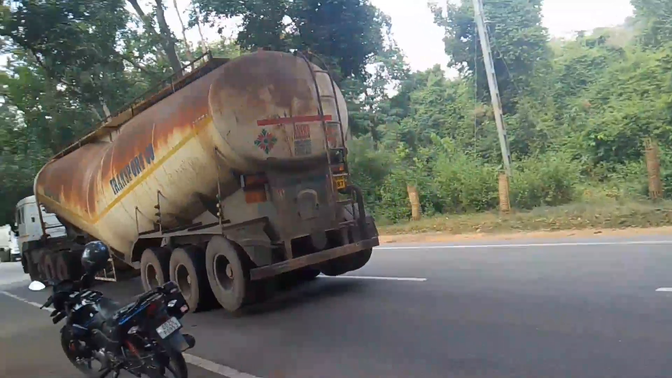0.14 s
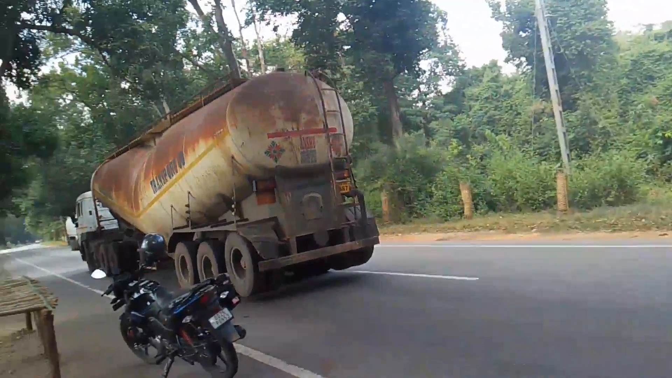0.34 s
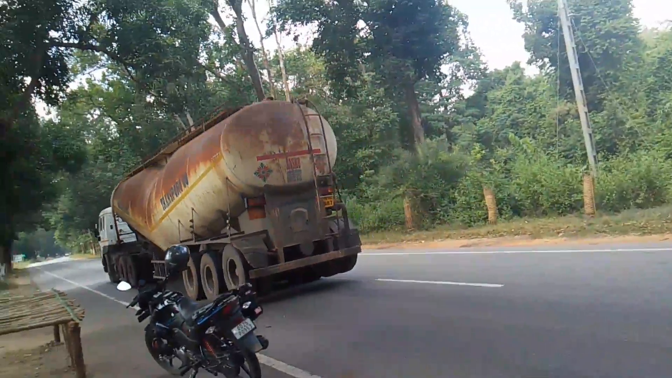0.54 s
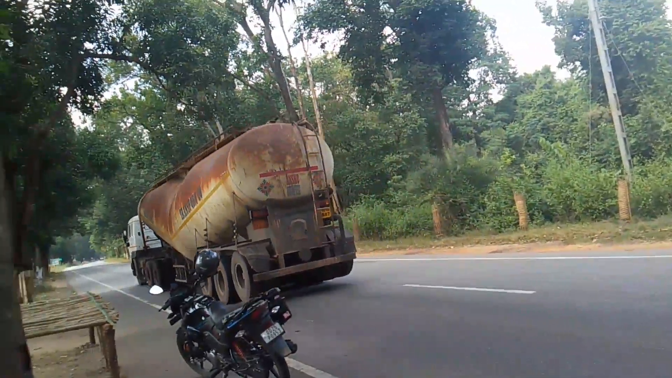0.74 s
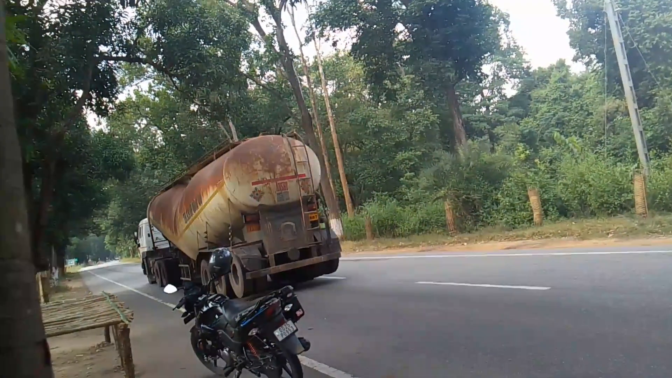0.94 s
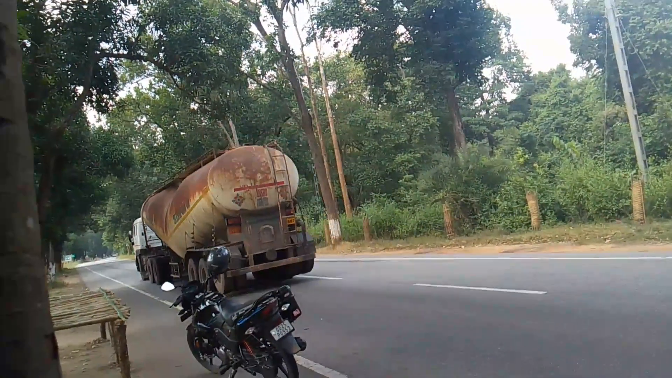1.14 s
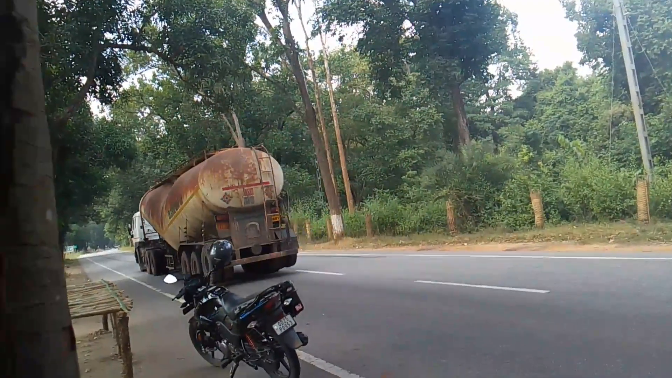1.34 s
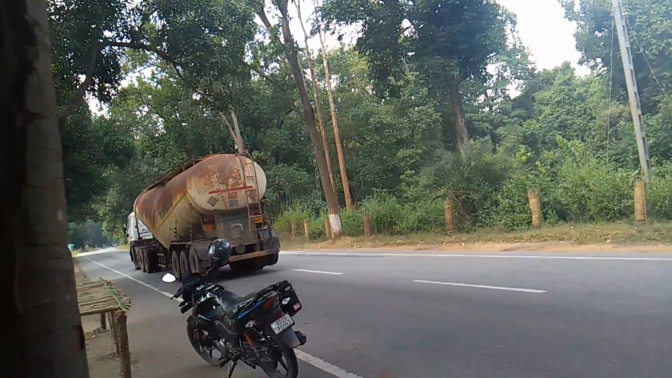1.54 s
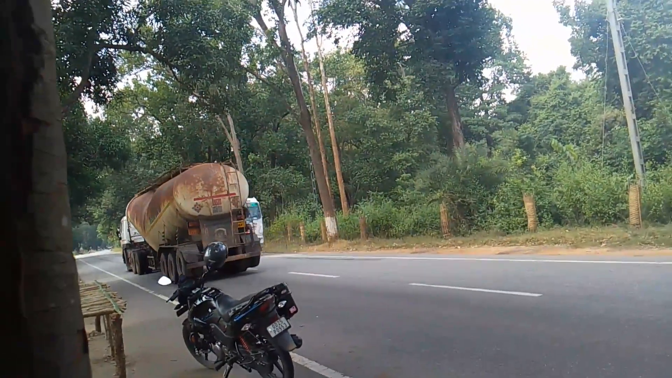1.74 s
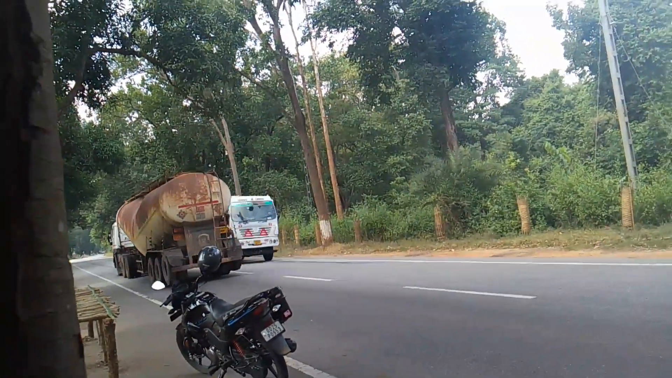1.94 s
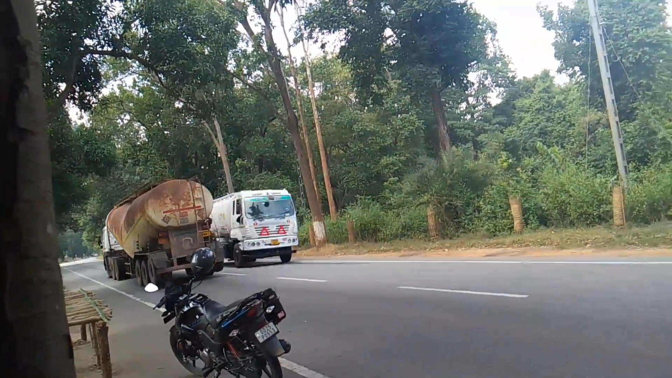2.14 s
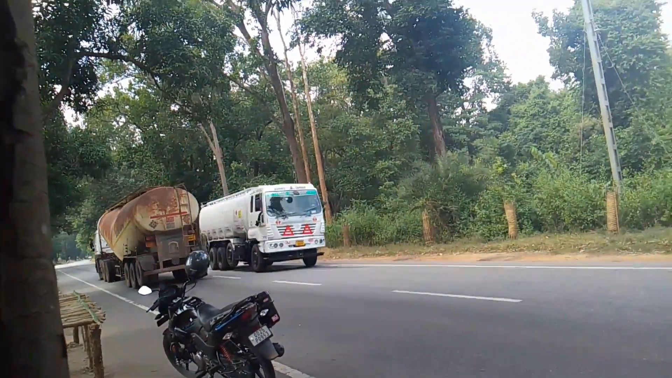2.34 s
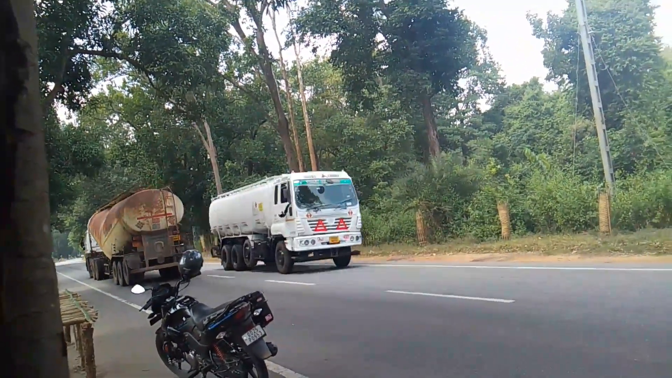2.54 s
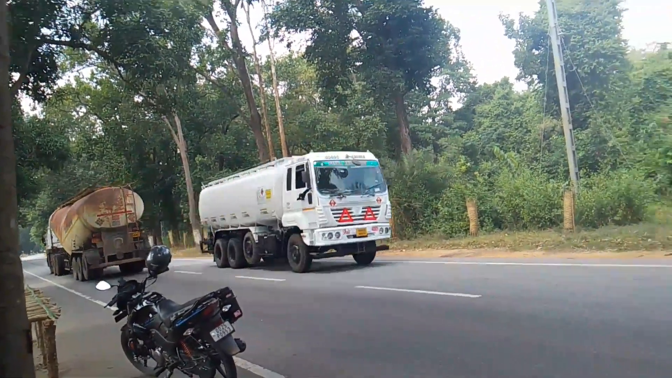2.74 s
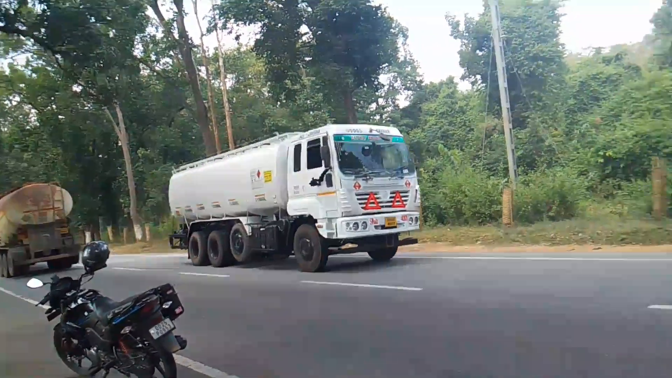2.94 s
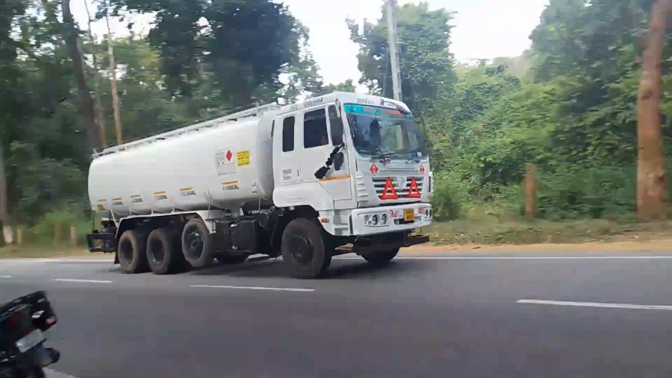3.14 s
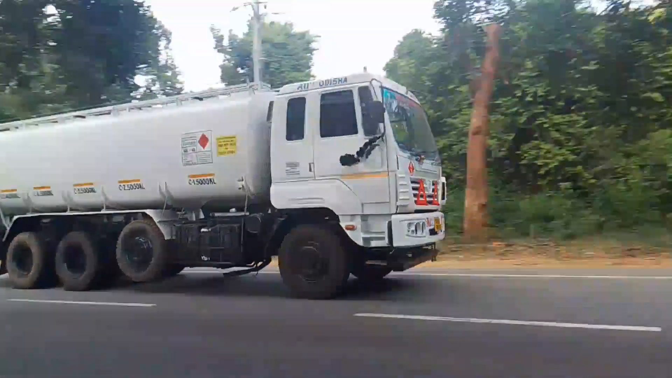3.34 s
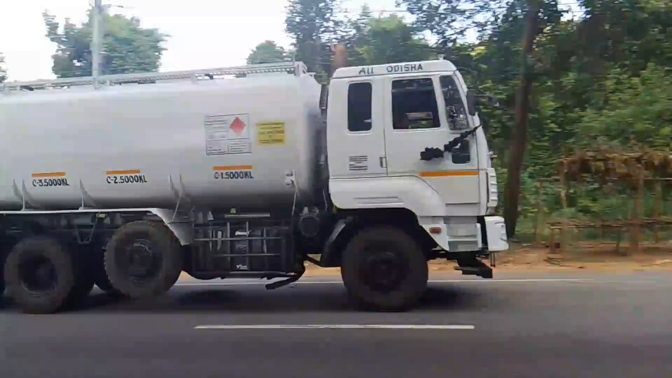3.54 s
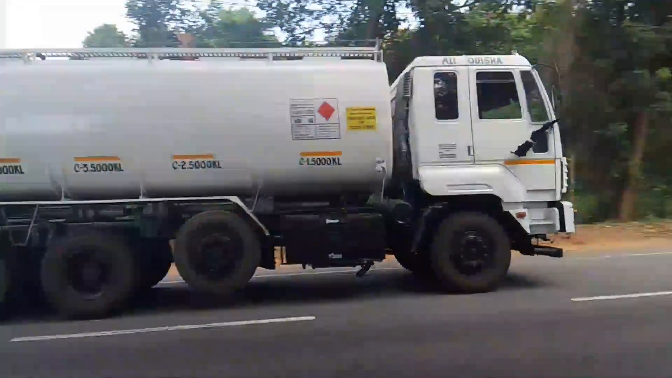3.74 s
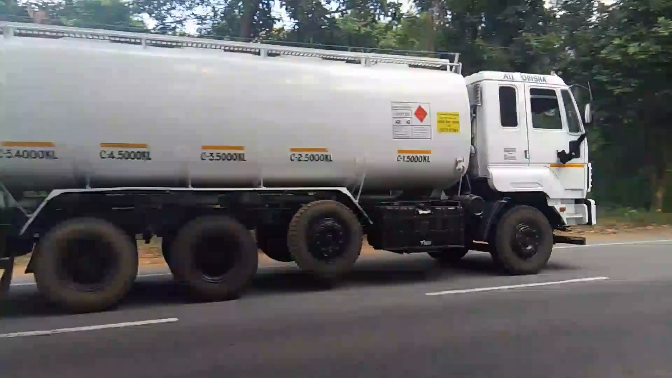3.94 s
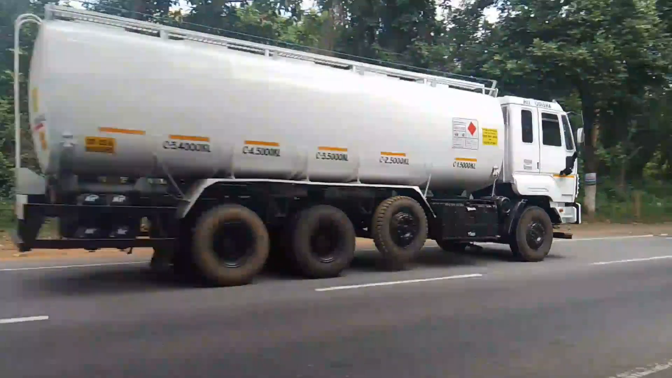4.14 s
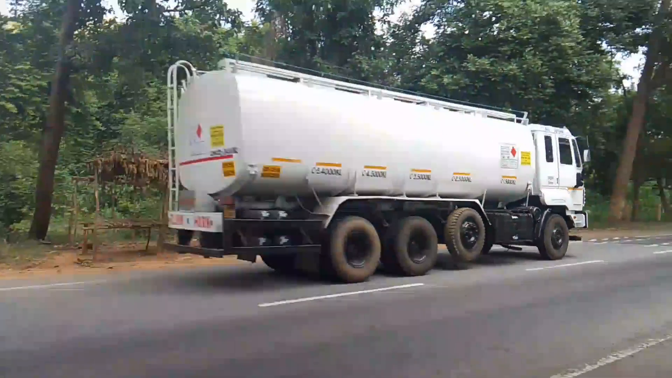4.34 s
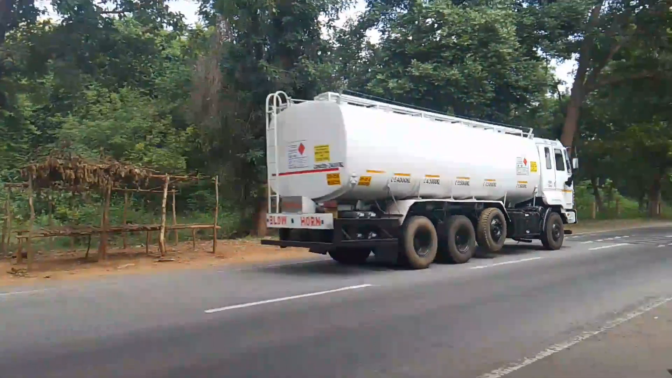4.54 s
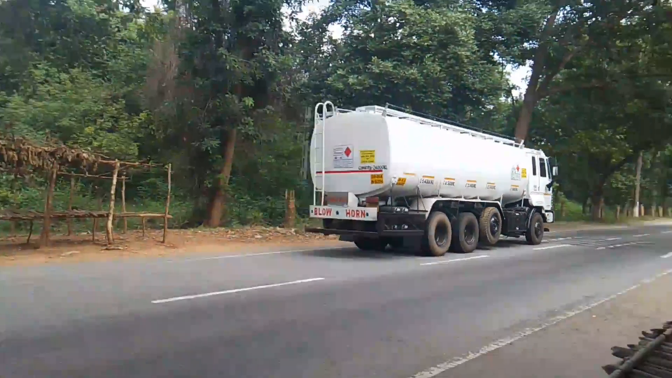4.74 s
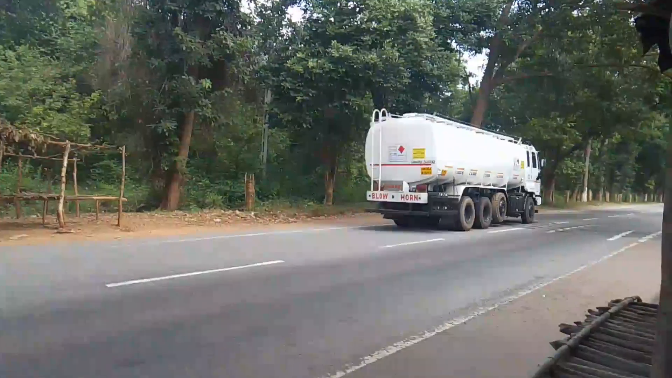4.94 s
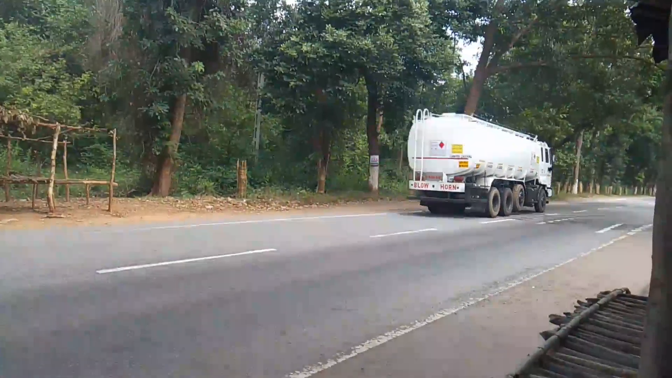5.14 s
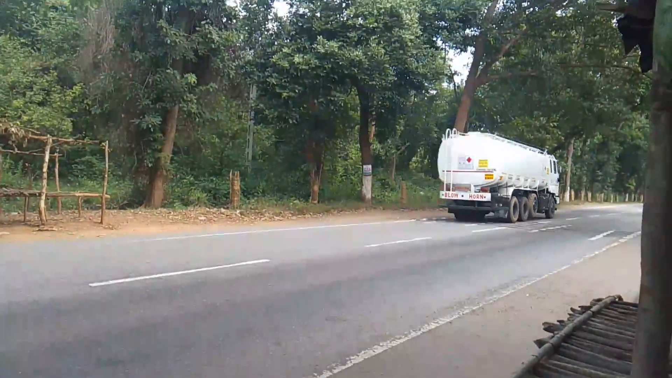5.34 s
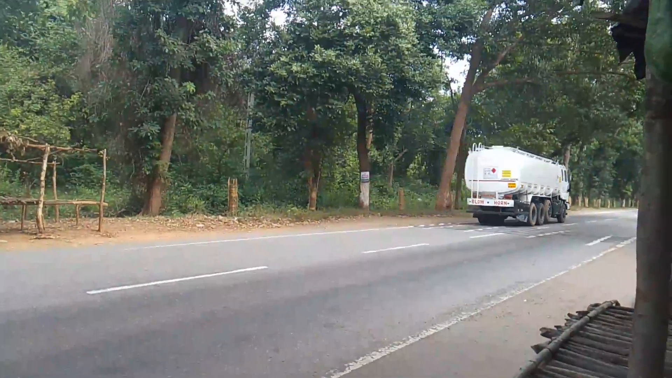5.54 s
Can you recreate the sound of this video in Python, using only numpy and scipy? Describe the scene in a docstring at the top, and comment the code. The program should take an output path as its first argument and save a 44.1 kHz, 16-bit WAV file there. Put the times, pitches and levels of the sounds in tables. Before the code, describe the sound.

A heavy tanker truck pulls away, booming and rattling, as a second one passes close by with roaring tyres and clunking steel.

```python
"""A tanker truck passes close by at about 4 s on a country road, heard from the verge. Its tyres roar,
hiss and hum, falling in pitch as it goes by, while loose steel clunks and grit clinks. It comes out from
behind a first tanker, which has just gone by and pulls away with a booming exhaust and a rattling trailer.
Both trucks rumble, and at the end the air dragged behind the second one stirs the roadside leaves."""
import sys
import numpy as np
from scipy import signal
from scipy.fft import rfft, irfft, next_fast_len
from scipy.io import wavfile
from scipy.ndimage import map_coordinates

SR = 44100
rng = np.random.default_rng(int(sys.argv[2]) if len(sys.argv) > 2 else 0)


def digitize_waveform(pressure):
    """Quantize a signal to 16-bit integers and store it at the path in sys.argv[1].

    Rows of a 2-D input are taken as channels; values are limited to [-1, 1].
    """
    field = np.atleast_2d(pressure).T
    bounded = np.clip(field, -1, 1)
    quanta = np.round(bounded * 32767).astype(np.int16)
    wavfile.write(sys.argv[1], SR, quanta)


N = 246959
T = np.arange(N) / SR
FREQS = np.arange(N // 2 + 1) * SR / N
SPEED_M_S, LANE_M, ABREAST_S = 16.5, 7.5, 4.07  # passing truck: speed, distance, when level with us
GONE_BY_S, HIDDEN_S = 0.43, 2.03  # leaving truck: how long ago it passed, when the other starts to hide it

# Road roar from the front of the truck, then from its rear: (pitch [Hz], level [dB])
FRONT_ROAR = [(270, -12), (337, 1), (390, -4), (460, 2), (520, 3.5), (580, 1), (720, -3.5), (930, -1.5),
              (1120, -5.5), (1200, -3), (1320, -10), (1660, -11.5), (1850, -20.5), (2300, -36)]
REAR_ROAR = [(295, 2.5), (415, -6.5), (505, -2), (590, -3), (745, -0.5), (900, -5), (1100, -3.5),
             (1340, -6), (1560, -9), (1740, -9), (1980, -21), (2480, -21.5)]
# The roar surges briefly: (time [s], rise [dB], half length [s])
ROAR_SURGES = [(2.44, 1.5, 0.042), (2.88, 1, 0.085), (4.31, 0.5, 0.023)]
# Hiss of the tyres on the road: (pitch [Hz], level [dB])
TYRE_HISS = [(1700, -1), (1930, -8), (2200, -3.5), (2650, -7.5), (3200, -8.5), (3900, -9.5), (4870, -15.5),
             (5500, -22.5), (7000, -21.5), (8400, -22.5), (9800, -39), (11400, -36), (13000, -51),
             (15400, -51)]
# The truck's frame shakes and the sizzle flares: (time [s], rise [dB], half length [s])
FRAME_SHAKES = [(3.4, 1.8, 0.12), (4.3, 1.5, .08), (4.95, 4, 0.025)]
def passing_truck(closest_s=4.06, pass_width_s=0.53):
    """Tyres roar and hiss on the road, front first, then rear; the highest sizzle only carries nearby."""
    along = (T - closest_s) / pass_width_s
    rear_share = (1 + np.tanh(along + 0.55)) / 2
    front = doppler(colour(ripple(noise(), depth_db=2.8, width_hz=28), FRONT_ROAR))
    rear = doppler(colour(ripple(noise(), depth_db=2.8, width_hz=28), REAR_ROAR))
    roar = np.sqrt(1 - rear_share) * front + np.sqrt(rear_share) * rear
    # the hollow wheel arches are heard only while they face the verge
    arches = colour(noise(), [(340, -1.5), (450, -2.5), (570, -1.5), (640, -5.5), (740, -4), (900, -7.5)])
    facing = 0.74 / (1 + along ** 2) ** 2
    roar = np.sqrt(1 - facing) * roar + np.sqrt(facing) * arches
    roar *= goes_by(db=-27, falloff=0.76, forward_db=0.94) * undb(.5 * wander(45) + bumps(ROAR_SURGES))
    grit = doppler(ripple(noise() + .45 * grains(1800, 2.9), depth_db=1.8, width_hz=110))
    hiss = colour(grit * undb(.6 * wander(35)), TYRE_HISS)
    hiss *= goes_by(db=-41.5, falloff=0.69, forward_db=0.54)
    spray = doppler(ripple(noise() + .55 * grains(1500, 2.9), depth_db=1.8, width_hz=140))
    spray *= undb(1.1 * wander(30))
    sizzle = colour(spray, [(4500, -4), (6500, 6), (8800, 5), (10000, 0.5), (13000, -8), (15500, -8)])
    sizzle *= goes_by(db=-48.5, falloff=1.44, forward_db=0.3, behind_m=2.6) * undb(bumps(FRAME_SHAKES))
    return roar + hiss + sizzle


# The nearest tyres hum in swells: (start [s], length [s], level [dB], fade [dB per s])
HUM_SWELLS = [(3.645, .17, -21.1, -6), (3.862, .365, -20.4, -9), (4.274, .33, -17, 22),
              (4.625, .04, -25, 0), (4.738, .17, -22, 50), (4.96, .21, -23, 14), (5.25, .07, -28.5, 0)]
# Higher tones of that hum: (multiple of the hum's pitch, level [dB])
TREAD_OVERTONES = [(2, -23), (3, -24), (4, -29)]
def tread_hum(tread_hz=243.6, blocks_per_tyre=52):
    """Tread blocks slap the road; each wheel turn bends the pitch, and the many tyres waver together."""
    hz = tread_hz * pitch_shift()
    wheel = turns(hz / blocks_per_tyre)
    phase = turns(hz * (1 + 0.012 * np.sin(wheel)))
    swells = np.zeros(N)
    for start, length, db, fade in HUM_SWELLS:
        on_off = sets_in(start, rise_s=.008) * (1 - sets_in(start + length, rise_s=.018))
        swells += undb(db - fade * np.clip(T - start, 0, length)) * on_off
    overtones = sum(undb(db) * beating(multiple * phase, 11) for multiple, db in TREAD_OVERTONES)
    near_tyre = (np.sqrt(2) * np.sin(phase) + overtones) * swells
    chorus_gain = goes_by(db=-33, falloff=0.084, forward_db=-0.2)
    chorus_share = chorus_gain / np.hypot(chorus_gain, swells)  # the other tyres give way to a near one
    return near_tyre + beating(phase, 19.4) * chorus_gain * chorus_share


# Swells of the whine as the truck comes closer: (time [s], level [dB], half length [s])
WHINE_SWELLS = [(2.43, -40.5, .06), (2.64, -42, .12), (2.875, -35.5, .1), (3.1, -39, .07)]
def tyre_whine(at_tyre_hz=483):
    """The tyres throw a wavering whine ahead of the truck, lost in the roar once it is near."""
    swells = sum(undb(db) * bell(s, half) for s, db, half in WHINE_SWELLS)
    hz = at_tyre_hz * pitch_shift() * (1 + .022 * wander(35))
    return np.sqrt(2) * np.sin(turns(hz)) * swells


# Brief tones in the roar: (time [s], level [dB], half length [s], pitch before the Doppler shift [Hz])
ROAR_TONES = [(3.45, -42, .09, 1230), (3.6, -38.5, .07, 610), (3.81, -39, .08, 970), (3.92, -37, .06, 730),
              (4.29, -36.5, .05, 595), (4.75, -40, .05, 760), (4.95, -44, .1, 1505)]
def roar_tones():
    """Brief tones stand out of the road roar, one after another."""
    out = np.zeros(N)
    for s, db, half, hz in ROAR_TONES:
        phase = turns(hz * pitch_shift() * (1 + .012 * wander(25)))
        out += np.sqrt(2) * undb(db) * bell(s, half) * np.sin(phase)
    return out


# Engine speed, nearly the same for both trucks: (time [s], firing rate [Hz])
FIRING_RATE = [(0, 62.6), (.75, 63.1), (1.5, 63.4), (1.75, 64), (3.5, 64.2), (4.5, 65.5), (5.6, 67)]
def firing_phase():
    """One turn for each firing of the engine."""
    return turns(np.interp(T, *np.transpose(FIRING_RATE)))


# Tones in the exhaust: (multiple of the firing rate, level [dB])
EXHAUST_TONES = [(1, -1), (2, -19.5), (3.42, -26), (4.13, -24), (5, -30), (5.55, -28), (6, -30)]
# The boom dips briefly, or swells where the depth is negative: (time [s], depth [dB], half length [s])
BOOM_DIPS = [(1.45, 1, 0.068), (1.955, 7, 0.043), (2.58, 7, 0.037), (3.0, 3, 0.13), (4.76, 13, 0.089),
             (5.1, -0.5, 0.089), (5.36, 11, 0.084)]
def exhaust(loudest_s=0.41, fade_s=1.23, overtone_fade_db_per_s=4.5):
    """Engine firings make a boom that turns rough as the two trucks mix; its higher tones fade sooner."""
    gain = undb(-21 - bumps(BOOM_DIPS)) / np.hypot(1, (T - loudest_s) / fade_s)
    phase = firing_phase()
    tones = np.zeros(N)
    for multiple, db in EXHAUST_TONES:
        unsteady = min(multiple - 1, 1)  # 0 for the lowest tone, which stays firm
        drift_db = unsteady * (2.2 * wander(7) - overtone_fade_db_per_s * T)
        wobble = unsteady * .25 * wander(6)
        tones += undb(db + drift_db) * np.sin(multiple * phase + wobble)
    roughness = .3 * sets_in(3.0, rise_s=0.27) * beating(phase, 28)
    return (np.sqrt(2) * tones + roughness) * gain


# The leaving truck's roar, then the rattle of its trailer: (pitch [Hz], level [dB])
LEAVING_ROAR = [(300, -1.5), (360, -1), (480, -0.5), (630, -5), (850, -6), (1110, -10), (1260, -7),
                (1700, -15.5), (2200, -24.5)]
TRAILER_RATTLE = [(1700, -6.5), (2100, -2), (2400, -4), (2900, -3), (3300, -7), (4050, -5), (4500, -8.5),
                  (5500, -11.5), (6600, -13.5), (8400, -10), (9300, -16.5), (10300, -23.5), (12000, -28.5),
                  (15400, -35)]
# Bumps in the road shake the trailer: (time [s], rise of the rattle [dB], half length [s])
ROAD_JOLTS = [(.085, 3, 0.03), (.355, 3, 0.046), (.6, 3, 0.035)]
def leaving_truck(drone_hz=175.4):
    """A throbbing roar, droning wheels and axles and a loose, jangling trailer fade into the distance."""
    throb = 1 + .16 * np.cos(firing_phase())
    roar = colour(noise() * undb(0.15 * wander(25)), LEAVING_ROAR) * throb * recedes(db=-37, falloff=0.45)
    phase = turns(drone_hz * (1 + .01 * wander(12)))
    low_tone = np.sin(phase) * undb(-40.5 + 2 * wander(4.6)) * bell(1.6, half_s=1.7)
    octave = np.sin(2 * phase) * recedes(db=-43, falloff=0.7) * undb(2 * wander(3.6))
    drone = (low_tone + octave) * (1 - sets_in(HIDDEN_S, rise_s=0.063))
    jangle = ripple(noise() + .4 * grains(2500, 2.6), depth_db=1.6, width_hz=110)
    rattle = colour(jangle * undb(0.56 * wander(30)), TRAILER_RATTLE) * recedes(db=-50, falloff=0.29)
    return roar + drone + rattle * undb(bumps(ROAD_JOLTS))


# Loose steel fittings knock on both trucks: (time [s], peak level [dB], main pitch [Hz])
FITTING_KNOCKS = [(.079, -33.3, 3005), (.1, -40, 2950), (.318, -41.5, 2990), (.37, -39, 2950),
                  (.461, -44, 2810), (.572, -41.5, 4100), (.597, -38, 2520), (3.19, -39.5, 3950),
                  (3.362, -36.5, 4050), (3.788, -32.5, 4050), (3.9, -37.5, 3950), (4.466, -36.5, 3850)]
# Heavy parts of the passing truck's frame clunk: (time [s], peak level [dB], main pitch [Hz])
FRAME_CLUNKS = [(3.553, -24, 869), (3.905, -22, 713), (4.019, -19, 522), (4.071, -22, 474),
                (4.143, -22, 641), (4.288, -20, 700), (4.505, -22, 890), (5.154, -21.5, 530)]
def loose_steel():
    """Small fittings knock brightly and heavy parts clunk lower down."""
    knocks = steel_hits(FITTING_KNOCKS, crack_hz=(1200, 5500))
    clunks = steel_hits(FRAME_CLUNKS, crack_hz=(400, 1600))
    return knocks + clunks


# Tones of struck steel: (multiple of the main pitch, level [dB], time to fade by 60 dB [s])
STEEL_TONES = [(.45, -5, .04), (.75, -6, .03), (.83, -7, .04), (1, 0, .055), (1.36, -7, .04),
               (1.57, -10, .04)]
def steel_hits(hits, crack_hz, crack_s=.01):
    """Steel strikes steel: a short crack, then ringing tones that share each blow differently."""
    out = np.zeros(N)
    t = T[:SR // 8]
    multiple, tone_db, ring_s = np.transpose(STEEL_TONES)[:, :, None]
    band = signal.butter(2, crack_hz, "band", fs=SR, output="sos")
    for s, db, hz in hits:
        share, detune = rng.standard_normal((2, len(multiple), 1))
        fades = undb(tone_db + 2 * share - 60 * t / ring_s)
        tones = np.sin(2 * np.pi * hz * multiple * (1 + .005 * detune) * t)
        crack = signal.sosfilt(band, rng.standard_normal(len(t))) * np.exp(-t / crack_s)
        place(out, (fades * tones).sum(0) + 1.2 * crack, s, db)
    return out


# Tones of the loose panels; wider ones die sooner: (pitch [Hz], width [Hz], level [dB])
PANEL_TONES = [(495, 30, 0), (610, 30, -1), (690, 28, -2), (770, 30, -1), (925, 32, -3), (1130, 35, -2),
               (1370, 35, -4), (1570, 40, -5), (1720, 40, -7)]
def panel_clatter(blows_per_s=55):
    """Loose panels chatter against the frame, heard once the passing truck shows its rear."""
    blows = (rng.random(N) < blows_per_s / SR) * rng.uniform(.5, 1, N)
    t = T[:SR // 8]
    chatter = np.zeros(N)
    for hz, width, db in PANEL_TONES:
        ring = np.exp(-np.pi * width * t) * np.sin(2 * np.pi * hz * t)
        chatter += undb(db) * signal.fftconvolve(blows * noise(), ring)[:N]
    nearness, _ = bearing()
    return unit(doppler(chatter)) * undb(-33.3) * nearness ** .7 * sets_in(4.2, rise_s=.1)


# Bits of flying grit: (time [s], peak level [dB], pitch [Hz], fade time [s])
GRIT_CLINKS = [(.056, -45, 8400, .009), (.465, -48, 8400, .009), (1.53, -48.5, 8300, .009),
               (2.925, -45, 8600, .003), (3.14, -45.5, 8300, .012), (3.29, -46, 7430, .01),
               (3.341, -40, 8500, .003), (3.365, -39.5, 8100, .012), (3.45, -43, 8200, .012),
               (3.697, -43, 7440, .012), (4.027, -40, 8820, .005), (4.166, -37.5, 6940, .012),
               (4.294, -38.5, 8610, .008), (4.316, -37, 8410, .01), (4.345, -38, 8300, .01),
               (4.67, -42.5, 7200, .012), (4.915, -43.5, 8400, .008), (4.943, -43.5, 8000, .01),
               (4.968, -43.5, 8400, .01), (5.14, -49, 9000, .009)]
def grit_clinks():
    """The tyres flick up grit; each bit makes a short crack with a brief metallic ring."""
    out = np.zeros(N)
    t = T[:SR // 20]
    for s, db, hz, fade_s in GRIT_CLINKS:
        band = signal.butter(4, [hz * .72, hz * 1.17], "band", fs=SR, output="sos")
        crack = signal.sosfilt(band, rng.standard_normal(len(t)))
        ring = .25 * np.sin(2 * np.pi * hz * t)
        place(out, (crack + ring) * np.exp(-t / fade_s), s, db)
    return out


# Thin tones of the passing truck's wheels and axles: (pitch [Hz], width [Hz], level [dB])
WHISTLE_TONES = [(8880, 800, 0), (11950, 1100, -11), (7150, 500, -7), (3950, 500, 1)]
def whistle():
    """Wheels and axles give a flickering whistle to the side and rear, sinking in pitch as they pass."""
    tones = sum(undb(db) * beating(turns(hz * pitch_shift()), width / 2)
                for hz, width, db in WHISTLE_TONES)
    return unit(tones) * undb(-57.5 + 1.8 * wander(12)) * sets_in(3.9, rise_s=0.14)


# Rumble of the leaving truck, then of the passing one: (pitch [Hz], level [dB])
LEAVING_RUMBLE = [(20, -8), (45, -10), (70, 2), (100, 1), (140, -6), (190, -4.5), (250, -3), (300, -11.5),
                  (400, -28)]
PASSING_RUMBLE = [(20, 0), (45, -4.5), (70, 1), (95, 3), (135, 0), (170, 3.5), (220, 4.5), (310, -8.5),
                  (400, -27.5), (600, -17.5)]
def rumble():
    """The heavy frames of both trucks make a low rumble that carries far."""
    leaving = colour(noise(), LEAVING_RUMBLE) * recedes(db=-34.5, falloff=0.18)
    passing = colour(noise(), PASSING_RUMBLE) * undb(.5 * wander(3.9))
    return leaving + passing * goes_by(db=-28.5, falloff=0.51, forward_db=-0.84)


# The gust of air, the fluttering leaves and their fine rustle: (pitch [Hz], level [dB])
WAKE_GUST = [(20, -7), (50, -1), (95, -3.5), (160, 1.5), (230, -1.5), (350, -6)]
LEAF_FLUTTER = [(500, 7), (700, 14), (1400, 2.5), (2200, 4), (3000, 1.5), (3900, -6), (5500, -12),
                (8400, -23), (11000, -30), (15400, -42)]
LEAF_RUSTLE = [(4000, 3.5), (5500, -5), (8400, 2.5), (10500, -7), (15400, -21)]
# Gusts flare in the leaves: (time [s], rise [dB], half length [s])
LEAF_FLARES = [(5.365, 3, .045), (5.52, 2, .025), (5.595, 7, .012)]
def wake():
    """Air dragged behind the passing truck buffets the verge; the leaves flutter, then rustle."""
    gust = colour(noise(), WAKE_GUST) * undb(-23 + 1.7 * wander(6.5)) * sets_in(5.43, rise_s=0.16)
    flutter = (noise() + .4 * grains(1500, 2.8)) * undb(1.1 * wander(25))
    leaves = colour(flutter, LEAF_FLUTTER) * undb(-38) * sets_in(5.31, rise_s=.035)
    rustle = colour(noise(), LEAF_RUSTLE) * undb(-50.5) * sets_in(5.42, rise_s=0.079)
    return gust + (leaves + rustle) * undb(bumps(LEAF_FLARES))


def bearing(behind_m=0):
    """For a point on the passing truck: nearness (1 when level with us), heading (1 coming, -1 going)."""
    along = SPEED_M_S * (T - ABREAST_S) - behind_m
    distance = np.hypot(along, LANE_M)
    return LANE_M / distance, -along / distance


def goes_by(db, falloff, forward_db, behind_m=0):
    """Loudness of the passing truck: db when level with us, weaker far off, thrown forward or back."""
    nearness, heading = bearing(behind_m)
    emerges = sets_in(2.33, rise_s=0.27)  # it comes out from behind the first truck
    return undb(db + forward_db * heading) * nearness ** falloff * emerges


def recedes(db, falloff, hidden_db_per_s=1):
    """Loudness of the leaving truck as it draws away and is hidden; falloff 1 means 1 / distance."""
    hidden_db = hidden_db_per_s * np.maximum(T - HIDDEN_S, 0)
    return undb(db - hidden_db) * (GONE_BY_S / (GONE_BY_S + T)) ** falloff


def pitch_shift(sound_m_s=343):
    """Doppler effect: the passing truck's pitch is multiplied by more than 1 coming, less going."""
    _, heading = bearing()
    return 1 / (1 - SPEED_M_S / sound_m_s * heading)


def doppler(x):
    """Play x faster as the truck comes and slower as it goes."""
    return map_coordinates(x, [np.cumsum(pitch_shift())], order=3, mode="grid-wrap")


def ripple(x, depth_db, width_hz):
    """Random narrow peaks and dips give the noise a faintly ringing colour above the low roar."""
    peaks = np.interp(FREQS / width_hz, np.arange(1000), rng.standard_normal(1000))
    return unit(irfft(rfft(x) * undb(depth_db * peaks * FREQS / (FREQS + 1000)), N))


def colour(x, points):
    """Shape the lows and highs of x with (pitch [Hz], level [dB]) points, cutting steeply beyond them."""
    hz, db = np.transpose(points)
    octave = np.log2(FREQS + 1)
    beyond = np.abs(octave - np.clip(octave, np.log2(hz[0]), np.log2(hz[-1])))
    return unit(irfft(rfft(x) * undb(np.interp(octave, np.log2(hz), db) - 21 * beyond), N))


def beating(phase, rate):
    """A tone that wavers about rate times a second, as when many like sources sound together."""
    return unit(wander(rate) * np.sin(phase) + wander(rate) * np.cos(phase))


def wander(rate):
    """A smooth random curve of typical size 1, changing about rate times a second."""
    size = next_fast_len(N)
    hz = np.arange(size // 2 + 1) * SR / size
    return unit(irfft(rfft(noise(), size) * np.exp(-(hz / rate) ** 2), size)[:N])


def grains(rate, spread_db):
    """Random clicks, about rate a second, most small and a few large."""
    clicks = (rng.random(N) < rate / SR) * noise()
    return unit(clicks * undb(spread_db * np.minimum(rng.exponential(size=N), 4)))


def place(out, hit, at_s, peak_db):
    """Add one hit to out at the given time and peak level."""
    start = int(at_s * SR)
    out[start:start + len(hit)] += undb(peak_db) * hit / np.abs(hit).max()


def turns(hz):
    """Phase: the angle in radians of something that turns hz times a second."""
    return 2 * np.pi * np.cumsum(hz) / SR


def sets_in(at_s, rise_s):
    """A smooth step from 0 to 1, halfway at at_s."""
    return (1 + np.tanh((T - at_s) / rise_s / 2)) / 2


def bell(at_s, half_s):
    """A smooth swell from 0 to 1 and back."""
    return np.exp(-((T - at_s) / half_s) ** 2)


def bumps(table):
    """One swell in dB for each (time [s], size [dB], half length [s]) row."""
    return sum(db * bell(s, half) for s, db, half in table)


def noise():
    """White noise: an even hiss."""
    return rng.standard_normal(N)


def unit(x):
    """Scale x to an average strength (rms) of 1."""
    return x / np.sqrt(np.mean(x ** 2))


def undb(db):
    """Turn decibels into a number to multiply by."""
    return 10 ** (np.asarray(db) / 20)


def scene():
    """Both trucks and the stirred leaves, added into one channel."""
    trucks = exhaust() + leaving_truck() + passing_truck()
    tones = tread_hum() + tyre_whine() + roar_tones() + whistle()
    background = rumble() + wake()
    rattles = loose_steel() + panel_clatter() + grit_clinks()
    return (trucks + tones + rattles + background)[None]


def record(dry, port_hz=8300, top_hz=15500):
    """The phone's small microphone opening rings in the treble; the very highest sounds are cut."""
    port_ring = signal.lfilter(*signal.iirpeak(port_hz, Q=6.5, fs=SR), dry)
    top_cut = signal.ellip(10, .2, 80, top_hz, fs=SR, output="sos")
    return signal.sosfilt(top_cut, dry + 0.5 * port_ring)


dry = scene()
out = record(dry)
digitize_waveform(out)
```